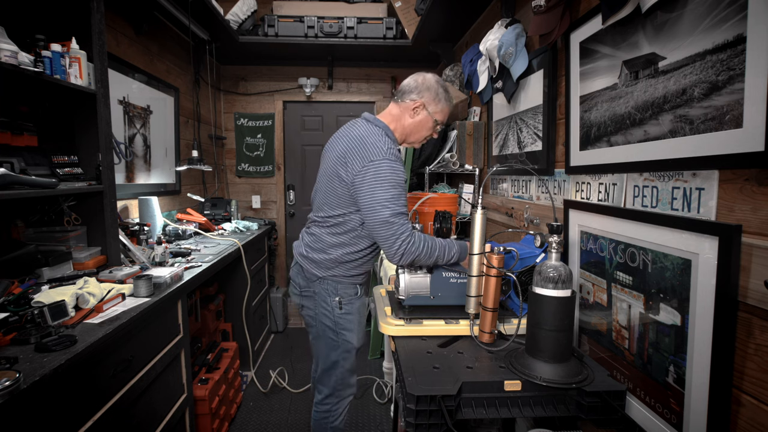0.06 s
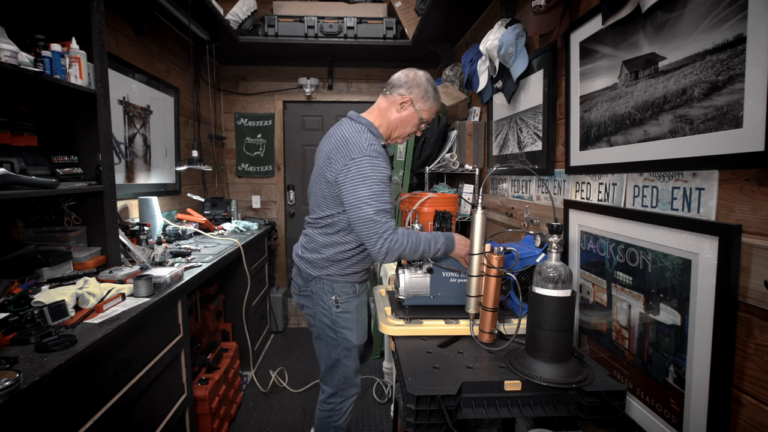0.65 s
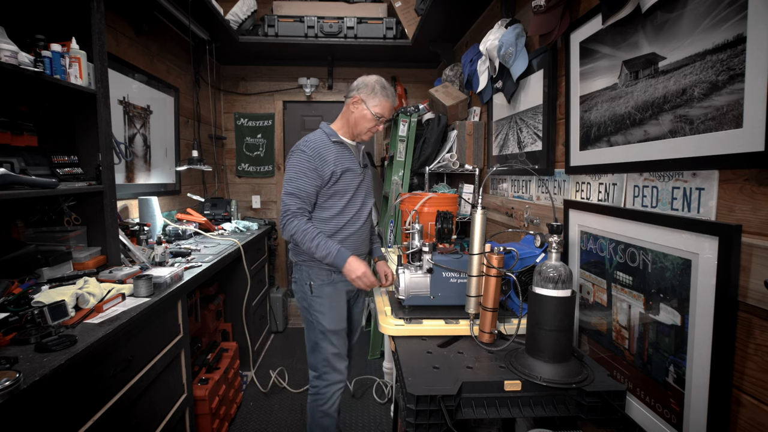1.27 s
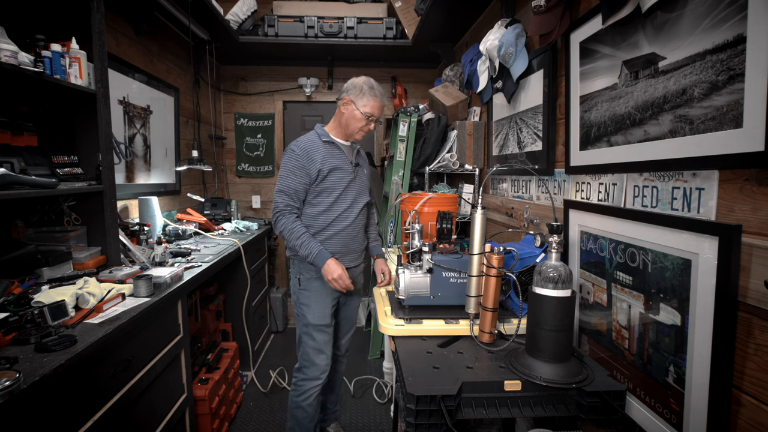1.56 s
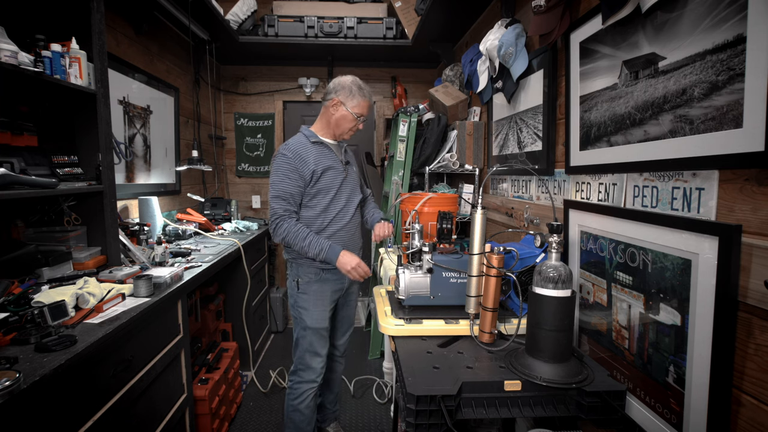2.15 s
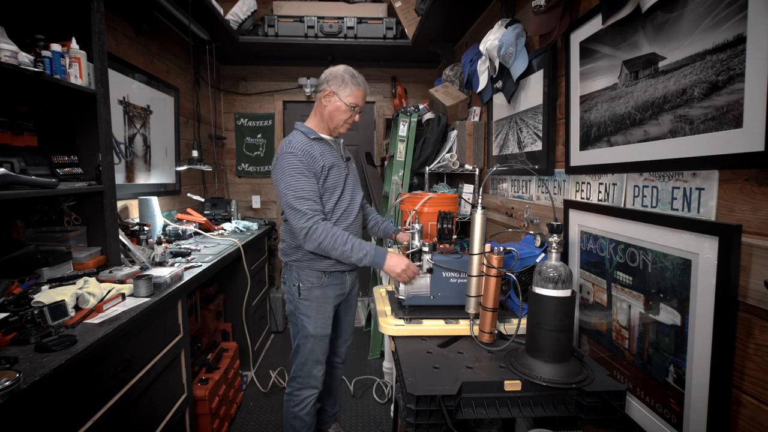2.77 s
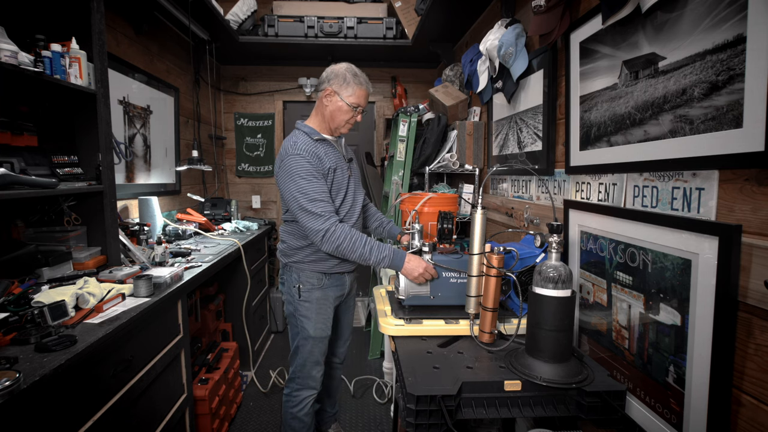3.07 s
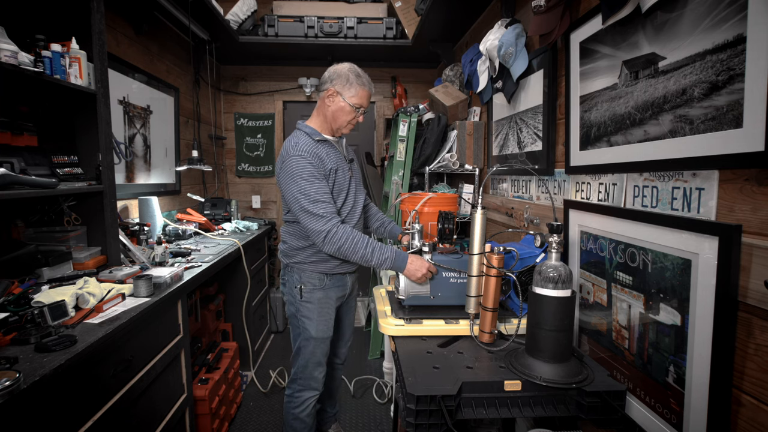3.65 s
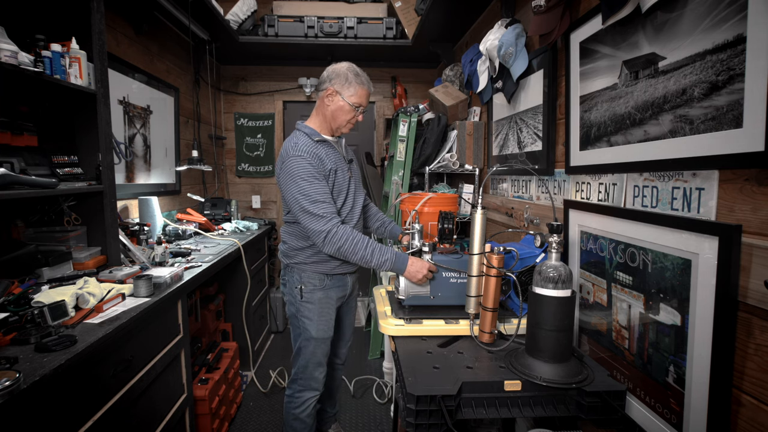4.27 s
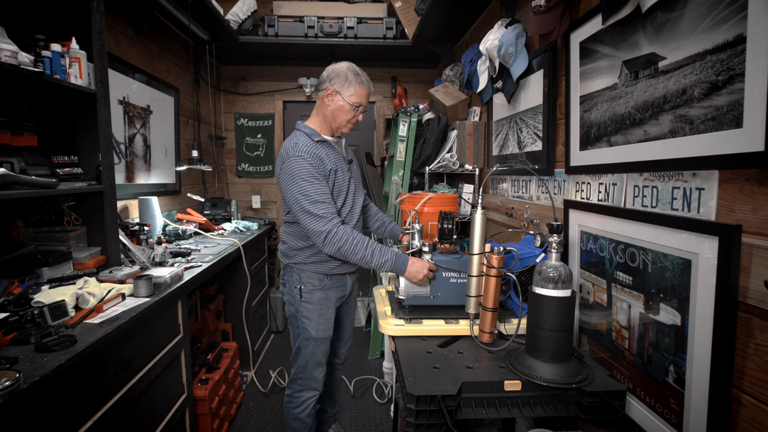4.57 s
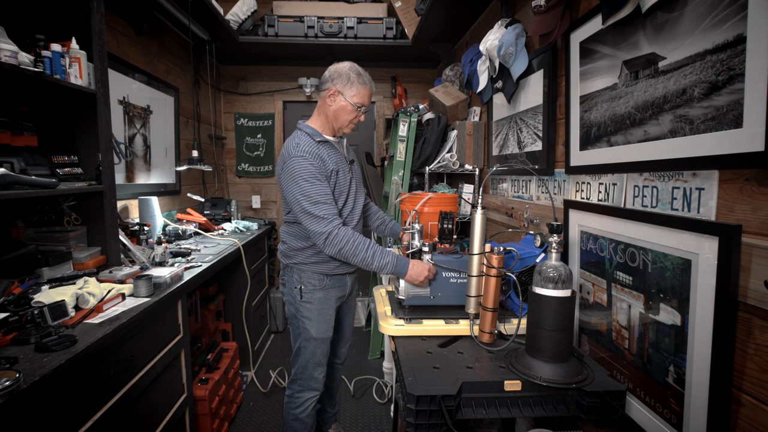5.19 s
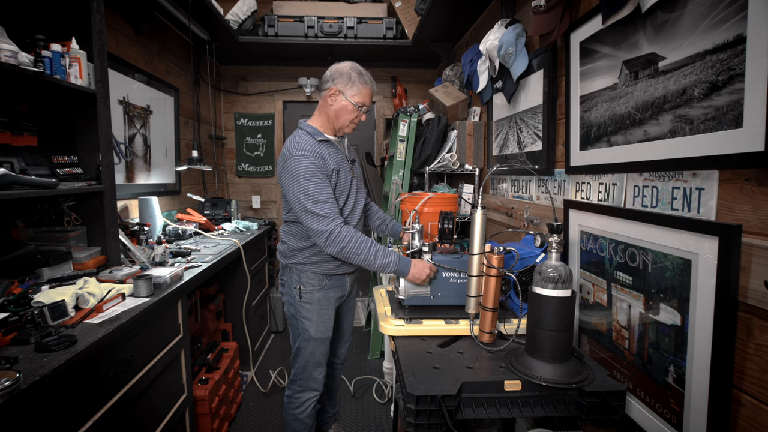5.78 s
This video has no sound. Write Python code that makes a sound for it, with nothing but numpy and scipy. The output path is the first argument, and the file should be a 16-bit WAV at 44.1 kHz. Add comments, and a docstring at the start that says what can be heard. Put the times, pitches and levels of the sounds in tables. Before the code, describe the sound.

Close to the microphone in a small workshop, a piston compressor switches on with a clunk, following a faint whine, soft bumps and a puff of air. The motor heaves a few times and races up loudly, then eases into a rapid metallic clatter and drone. A closing valve sputters and whistles faintly, and the hum pulses as the machine gradually fades.

```python
"""Small compressor in a cramped workshop.

One microphone, close to a high-pressure piston compressor on a table. A faint whine, handling bumps and
a short hiss come first; the switch clunks, the motor heaves through a few chugs and runs up. Each turn
knocks the cylinder head, shakes the case and draws air; the loud start settles. The bleed valve is
screwed shut and air hisses, spits and whistles in its gap; the knocks grow uneven, the hum beats slowly,
and the sound fades away."""
import sys
import numpy as np
from scipy import signal
from scipy.fft import rfft, irfft, next_fast_len
from scipy.io import wavfile
from scipy.ndimage import uniform_filter1d

SR = 44100
rng = np.random.default_rng(int(sys.argv[2]) if len(sys.argv) > 2 else 0)


def put_to_file(sound):
    """Save the sound as 16-bit audio at rate SR, in the file named by the first command-line argument."""
    columns = np.atleast_2d(sound).T  # one column per channel
    safe = np.clip(columns, -1, 1)
    whole_steps = np.round(safe * 32767)
    wavfile.write(sys.argv[1], SR, whole_steps.astype(np.int16))


N = 257086
TIME = np.arange(N) / SR

START_S, KNOCKING_S, ENGAGED_S = .76, .9, .948  # the crank moves, the piston knocks, then bears its load
START_HZ, RUN_HZ, SPIN_UP_S = 16.2, 56.627, .18  # crank turns per second; time to speed up by a factor e
TOP_OF_STROKE_S = 1.2009  # one moment when the piston is at the top
CLOSING_S, CLOSED_S, LOADED_S = 1.58, 2.54, 3.2  # the bleed valve starts to close, is shut; full pressure
BEAT_HZ, BEAT_CREST_S = 6.82, 4.2  # slow beating of the hum

# Noise colours. Each row: frequency in Hz, relative spectral level in dB.
ROOM_COLOUR = [(24, -65), (40, -27), (102, -17.5), (271, -9), (354, -1.5), (623, -13), (815, -9),
               (899, -16.5), (1970, -25), (2580, -40), (4010, -31), (5130, -34), (10700, -64.5),
               (14000, -84)]  # the workshop itself
PUFF_COLOUR = [(590, -46), (1000, -15), (1230, -3), (1500, -8), (2020, 4.5), (3210, -19.5), (3600, -10),
               (6270, -17), (7180, -16), (9640, -17), (15000, -43)]  # the short hiss before the switch
GASP_COLOUR = [(2000, -2), (2900, 3), (3600, -8), (4300, -17), (4800, -0.5), (6000, 2), (7000, -10),
               (7900, -3.5), (9500, -17.5), (12600, -17.5), (15500, -32)]  # the intake at low speed
GRIND_COLOUR = [(150, -1.5), (300, -0.5), (1000, -2), (2000, -6.5), (3000, -18)]  # the slow crank
INTAKE_COLOUR = [(2000, 10.5), (3150, 2), (3500, -8), (4600, -8.5), (5300, -6), (6100, 4), (7000, -6.5),
                 (7800, -3.5), (10000, -13.5), (11200, -15), (12600, -13.5), (15500, -33)]  # air through the valves at speed
RUMBLE_COLOUR = [(70, -32), (100, -21), (180, -23), (270, -12.5), (430, 1), (560, -7), (780, -17),
                 (1100, -6)]  # the shaking case
DRUMMING_COLOUR = [(80, -19), (120, -14), (170, -7), (270, 9), (350, -7), (480, -5), (700, -12), (1000, -7)]  # the table under the straining motor
CLATTER_COLOUR = [(500, -37), (780, -21), (1000, -3), (1400, 14.5), (1800, 20.5), (2300, 3), (2550, -15),
                  (2750, -9), (3100, 0), (3700, -35.5), (6000, -65)]  # loose parts

# Resonances. Each row: frequency in Hz, width in Hz, relative level in dB.
HEAD_MODES = [(1186.8, 5.35, -22.5), (1398.3, 17.2, -15), (1581, 4.2, -32), (1716, 71, -14),
              (1918, 34, -19), (3030, 340, -6.5)]  # the cylinder head
CLACK_MODE = [(1790, 270, 0)]  # its main mode, a short clack
COVER_MODES = [(620, 920, -21), (903.4, 11, -14.5), (1008.5, 18.3, -8), (1160, 16, -12), (1280, 1040, -7.5),
               (2137, 39, -17), (2010, 207, 11.5), (2290, 130, 3.5), (2800, 500, -16)]  # the sheet-metal cover
THUMP_MODES = [(508, 180, 8.5), (630, 170, -3)]  # the case under each knock
JET_MODES = [(5536, 420, -3), (6300, 930, -6), (7100, 910, -3.5), (7420, 1600, -3), (8520, 600, -6),
             (9200, 480, -9.5), (9960, 470, -9.5), (10800, 1200, -15), (12400, 1200, -18),
             (13200, 800, -19), (14300, 1600, -23)]  # the jet at the bleed valve
CONTACT_MODES = [(1710, 440, 1.5), (2200, 450, -34.5), (670, 490, -21)]  # the click of hard contact

# Soft bumps of handling. Each row: start in seconds, level in dB.
HANDLING_BUMPS = [(0.015, -27), (0.205, -43), (0.243, -34), (0.288, -28.5), (0.384, -30), (0.626, -34)]
# The motor's first heaves. Each row: start in seconds, level in dB, pitch in Hz,
# time to die by 60 dB in seconds, relative click level in dB.
MOTOR_CHUGS = [(0.7622, -9.5, 306, 0.012, -5), (0.78, -10, 259, 0.018, -22), (0.81, -11, 234, 0.022, -8),
               (.821, -19, 214, 0.022, 10), (0.8536, -6.5, 263, 0.017, -7), (0.8669, -13, 308, 0.046, 7.5),
               (0.8857, -9, 266, 0.023, -6), (0.914, -12.5, 250, 0.022, 0), (0.925, -17, 300, 0.023, 4)]
# Gasps of the intake while the crank is slow. Each row: peak time in seconds, level in dB.
INTAKE_GASPS = [(.765, -42), (0.778, -33), (0.82, -29.5), (0.855, -24), (0.887, -22.5), (0.917, -26.5),
                (0.942, -25.5), (.964, -27), (.983, -24)]
# Hoarse air in the valve gap. Each row: peak time in seconds, level in dB, centre in Hz, width in Hz,
# spread in seconds.
VALVE_RASPS = [(2.563, -45, 2400, 385, 0.24), (2.716, -46.5, 1360, 302, 0.18),
               (2.995, -62, 3060, 256, 0.26), (5.0, -77, 2820, 446, 1)]
# Whistles in the gap. Each row: peak time in seconds, level in dB, pitch in Hz, spread in seconds.
VALVE_WHISTLES = [(3.143, -51.5, 7740, 0.053), (3.23, -54.5, 6720, 0.16), (3.223, -57.5, 9150, 0.038),
                  (3.55, -58, 7040, 0.17), (3.85, -63, 6760, 0.18), (3.897, -64, 7070, 0.25),
                  (3.927, -69, 9900, 0.11), (4.08, -76, 13300, 0.19), (4.31, -68, 9300, 0.073),
                  (4.912, -68.5, 8650, 0.09), (5.2, -67, 8300, .03)]
# The clearest spits in the gap. Each row: peak time in seconds, level in dB, pitch in Hz.
CLEAR_SPITS = [(3.6, -60, 5270), (3.865, -57, 5500), (3.971, -59, 5940), (3.979, -51, 6900),
               (4.094, -52, 5570), (4.342, -60, 5500), (4.482, -58, 5480), (4.855, -64, 5580),
               (4.943, -55.5, 5540), (5.209, -62, 5850), (5.313, -61, 5580)]
# Hum of the case. Each row: multiple of the crank speed, relative level in dB running, then straining.
HUM_HARMONICS = [(2, -26.5, -12), (3, -25.5, -11.5), (4, -21, -13), (5, -11, -5.5), (6, -15.5, -12),
                 (7, 1, -7.5), (8, -8.5, -12.5), (9, -13.5, -12), (10, -17.5, -7.5), (11, -16.5, -28),
                 (12, -25, -9), (13, -19.5, -7.5), (15, -25, -12), (16, -20.5, -12.5), (18, -31, -23)]
# The table and near walls throw each knock back to the microphone. Each row: delay in seconds, gain in dB.
NEAR_ECHOES = [(.0028, -20.5), (.0075, -27), (.01, -20.5)]
# Swells and dips as the sound fades. Each row: time in seconds, shaking gain in dB, knock gain in dB.
FADE_GAINS = [(2.2, 0.5, 2.5), (2.7, -4, 0), (2.91, -5, -2), (2.98, -3.5, -0.5), (3.15, -9.5, -2.5),
              (3.23, -9, -3.5), (3.29, -7.5, -3), (3.41, -14, -10), (3.48, -13, -8), (3.7, -18.5, -13),
              (3.84, -19, -16.5), (3.95, -20, -16), (4.04, -19.5, -13.5), (4.15, -20, -18),
              (4.23, -19.5, -16.5), (4.31, -21.5, -17.5), (4.4, -18.5, -13), (4.48, -21.5, -17.5),
              (4.57, -21, -19.5), (4.64, -22.5, -22), (4.7, -22, -18.5), (4.77, -27.5, -25),
              (4.95, -23.5, -24.5), (5.1, -26.5, -25.5), (5.4, -25, -26.5), (5.7, -26.5, -27.5),
              (5.83, -33.5, -33)]


def undb(db):
    """Decibels to gain."""
    return 10 ** (np.asarray(db) / 20)


def unit(x):
    """Scale to rms 1."""
    return x / np.sqrt(np.mean(x ** 2))


def ramp(start_s, end_s):
    """Rises from 0 to 1 between two times."""
    return np.clip((TIME - start_s) / (end_s - start_s), 0, 1)


def since(s):
    """Seconds elapsed after a moment, zero before it."""
    return np.maximum(TIME - s, 0)


def swell(s, spread_s):
    """A bell-shaped rise and fall around one moment."""
    return np.exp(-.5 * ((TIME - s) / spread_s) ** 2)


def throb(turns, depth_db, crest):
    """A gain that swings up and down once a turn; the crest's place is a share of the turn."""
    return undb(depth_db * np.cos(2 * np.pi * (turns - crest)))


def walk(rate_hz):
    """A random wander with a spread near 1."""
    knots = 1.1 * rng.standard_normal(size=12000)
    return np.interp(TIME * rate_hz, np.arange(len(knots)), knots)


def noise(colour):
    """Noise of rms 1 with the given spectrum, falling by 20 dB an octave outside it."""
    hz, db = np.transpose(colour)
    size = next_fast_len(N, real=True)
    octave = np.log2(np.maximum(np.arange(size // 2 + 1) * SR / size, 1))
    outside = np.abs(octave - np.clip(octave, np.log2(hz[0]), np.log2(hz[-1])))
    gain = undb(np.interp(octave, np.log2(hz), db) - 20 * outside)
    return unit(irfft(rfft(rng.standard_normal(size)) * gain)[:N])


def highpass(x, hz, order=2):
    """Shed the bass, which small parts barely radiate."""
    return signal.sosfilt(signal.butter(order, hz, "high", fs=SR, output="sos"), x)


def lowpass(x, hz):
    """Cut the treble steeply."""
    return signal.sosfilt(signal.butter(6, hz, fs=SR, output="sos"), x)


def band(x, hz, width_hz):
    """Keep a band around a centre frequency."""
    edges = [hz - width_hz / 2, hz + width_hz / 2]
    return signal.sosfilt(signal.butter(2, edges, "band", fs=SR, output="sos"), x)


def convolve(x, response):
    """Play x through an impulse response."""
    return signal.oaconvolve(x, response)[:N]


def ring(modes):
    """Impulse response of damped modes."""
    t = TIME[:SR // 10]
    return sum(undb(db) * np.exp(-np.pi * width * t) * np.sin(2 * np.pi * hz * t)
               for hz, width, db in modes)


def workshop(x, t60_s, wet_db):
    """The direct sound reaches the microphone first, then a short, dense tail off cluttered walls."""
    t = TIME[:SR // 2]
    tail = rng.standard_normal(len(t)) * np.exp(-np.log(1000) * t / t60_s) * (t > .004)
    return x + undb(wet_db) * convolve(x, tail / np.sqrt(np.sum(tail ** 2)))


def room_tone(fall_db_per_s=22, floor_db=-90.5):
    """Behind everything, the room's noise dies to a floor under a faint steady hiss."""
    hiss = unit(band(rng.standard_normal(N), 4250, 3000)) * undb(-78.5)
    room_db = np.maximum(-39.5 - fall_db_per_s * since(.038), floor_db)
    return noise(ROOM_COLOUR) * undb(room_db) + hiss


def whine(hz=814, stop_s=.32):
    """A thin whine sags in level, then rings out quickly."""
    tone = np.sqrt(2) * np.sin(2 * np.pi * np.cumsum(hz + 1.9 * walk(25)) / SR)
    return tone * undb(-42.5 - 24 * TIME - 105 * since(stop_s))


def puff(peak_s=.3454, rise_db_per_s=804, fall_db_per_s=314):
    """One short hiss ahead of the switch."""
    below_peak_db = np.maximum(rise_db_per_s * (peak_s - TIME), fall_db_per_s * (TIME - peak_s))
    return noise(PUFF_COLOUR) * undb(-34 - below_peak_db)


def thud(s, db, hz, t60_s, click_db):
    """A soft blow sets the unit bouncing on its table, with a click of hard contact."""
    width = np.log(1000) / np.pi / t60_s
    body = ring([(hz, width, 0), (hz * 1.18, width * 1.4, -8), (hz * 1.48, width * 1.16, -9)])
    click = highpass(ring(CONTACT_MODES), 720)
    blow = lowpass(highpass(body, .6 * hz) + undb(click_db) * click, 1920)
    return undb(db - .5) * np.pad(blow, (int(s * SR), N))[:N]


def blows():
    """At the table: handling bumps, the clunk of the switch and the motor's first heaves."""
    bumps = sum(thud(s, db, hz=121, t60_s=.035, click_db=-21) for s, db in HANDLING_BUMPS)
    switch = thud(s=.6868, db=-11.5, hz=325, t60_s=.051, click_db=-1.5)
    chugs = sum(thud(*chug) for chug in MOTOR_CHUGS)
    return bumps + switch + chugs


def grinding():
    """The crank grinds briefly while it is still slow."""
    grit = noise(GRIND_COLOUR) * undb(-30 + 3.4 * walk(250))
    return grit * swell(.889, .054) * ramp(START_S, START_S + .01)


def gasps(rise_s=.003, decay_s=.0062):
    """A small leak after the switch, then the intake draws air in separate gasps."""
    leak = undb(-49) * swell(.7275, .011)
    breaths = sum(undb(db) * ramp(s - rise_s, s) * np.exp(-since(s) / decay_s) for s, db in INTAKE_GASPS)
    return noise(GASP_COLOUR) * (leak + breaths)


def edge_tone(hz, width_hz, wander=.009, flutter_db=3.5):
    """Air over a sharp edge: a narrow, fluttering band of rms 1 whose pitch wanders a little."""
    phase = 2 * np.pi * np.cumsum(hz * (1 + wander * walk(30))) / SR
    tone = walk(width_hz) * np.cos(phase) + walk(width_hz) * np.sin(phase)
    return unit(tone * undb(flutter_db * walk(110)))


def whistles():
    """In the nearly shut gap wavering whistles come and go."""
    return sum(edge_tone(hz, width_hz=620) * undb(db) * swell(s, spread_s)
               for s, db, hz, spread_s in VALVE_WHISTLES)


def rasp(turns):
    """Each stroke forces a hoarse burst of air through the narrowed gap."""
    bursts = throb(turns, depth_db=7, crest=.04)
    return sum(unit(band(rng.standard_normal(N), hz, width) * bursts) * undb(db) * swell(s, spread_s)
               for s, db, hz, width, spread_s in VALVE_RASPS)


def spit(s, db, hz, spread_s, width_hz=260):
    """One tiny squeak of air, roughened by a drifting phase."""
    t = np.arange(-SR // 40, SR // 40) / SR
    drift = np.cumsum(rng.standard_normal(len(t))) * np.sqrt(2 * np.pi * width_hz / SR)
    phase = uniform_filter1d(2 * np.pi * hz * t + drift, size=40)
    squeak = undb(db) * np.exp(-.5 * (t / spread_s) ** 2) * np.sin(phase)
    return np.pad(squeak, (int(s * SR) - SR // 40, N))[:N]


def spits(fade_db, count=170, from_s=2, spread_s=.0035):
    """Moisture spits through the gap at random on the jet's seven lowest resonances; a few stand out."""
    out = sum(spit(s, db, hz, spread_s) for s, db, hz in CLEAR_SPITS)
    for when, which, weakness, detune, length in rng.random((count, 5)):
        s = from_s + when * (TIME[-1] - from_s)
        hz, width, mode_db = JET_MODES[int(which * 7)]
        db = mode_db - 40.5 - 12 * weakness + .8 * np.interp(s, TIME, fade_db)
        out += spit(s, db, hz + width * (detune - .5), spread_s * (.3 + .7 * length))
    return out


def bleed_jet(turns, closing, fade_db, tilt_db_per_octave=7):
    """A sputtering jet: as the gap narrows its high resonances emerge and each stroke's rush dies."""
    jet = 0
    for hz, width, db in JET_MODES:
        tone = edge_tone(hz, width)
        flicker_db = 3 * walk(14) + 2.5 * walk(70)  # slow swells and fast sputter
        tilt_db = tilt_db_per_octave * closing * np.log2(hz / JET_MODES[0][0])
        jet += tone * undb(db + flicker_db + tilt_db)
    jet = workshop(highpass(jet, 4900, order=8), t60_s=.016, wet_db=-10)
    sputter = unit(jet) * undb(-53 + 2 * closing)
    gusts = band(rng.standard_normal(N), 4640, 880) * throb(turns, depth_db=9, crest=.8)
    rush = unit(gusts) * undb(-54.5) * (1 - closing)
    return (sputter + rush) * (TIME > START_S) * undb(.98 * fade_db)


def intake(turns):
    """Air spits through the valves just before each knock, never twice alike."""
    hiss = noise(INTAKE_COLOUR) * throb(turns, depth_db=3.75, crest=.8) * undb(3.2 * walk(350))
    return unit(workshop(hiss, t60_s=.031, wet_db=-6.5))


def crank_speed():
    """The motor gains speed exponentially, then locks softly to its running speed, given as 1."""
    free_hz = START_HZ * np.exp((TIME - START_S) / SPIN_UP_S)
    return 1 / (1 + (RUN_HZ / free_hz) ** 10) ** (1 / 10)


def case_hum(turns, speed, pressure):
    """The case hums on the crank's multiples and rumbles; while the motor strains, the table drums."""
    strain = 1 - ramp(.97, 1.47)
    boom_db = 6 * (1 - ramp(1.5, 2.6))  # extra low hum until the pressure builds
    tones = 0
    for multiple, running_db, straining_db in HUM_HARMONICS:
        boomed_db = running_db + boom_db * np.exp(-.5 * (multiple - 4.03) ** 2)
        rough_db = (1.3 + 2 * strain) * walk(45)
        level_db = boomed_db * (1 - strain) + straining_db * strain + rough_db
        tones += undb(level_db) * np.sin(2 * np.pi * (multiple * turns + rng.random()))
    beat = throb(BEAT_HZ * (TIME - BEAT_CREST_S), depth_db=.8 + 1.8 * pressure, crest=0)
    hum = undb(4) * tones * beat * speed ** 3
    rumble = noise(RUMBLE_COLOUR) * undb(-9.5)
    drumming = noise(DRUMMING_COLOUR) * undb(-6) * strain ** 2
    return hum + (rumble + drumming) * throb(turns, depth_db=7.5 + 13 * (1 - speed), crest=.85)


def strokes(turns, scatter_db, jitter_s):
    """One pulse at the top of each stroke, as uneven in size and timing as the two curves say."""
    tops = np.interp(np.arange(np.ceil(turns[0]), turns[-1]), turns, np.arange(N))
    top_samples = tops.astype(int)
    timing_draw, size_draw = rng.standard_normal((len(tops), 2)).T
    at = np.clip(tops + jitter_s[top_samples] * SR * timing_draw, 0, N - 2)
    size = undb(scatter_db[top_samples] * size_draw)
    whole, fraction = at.astype(int), at % 1  # each pulse is shared between two samples
    return np.bincount(whole, size * (1 - fraction), N) + np.bincount(whole + 1, size * fraction, N)


def piston(turns, speed, pressure, hardness_db):
    """Knocks ring the head and thump the case; hard ones ring the cover. At speed loose parts clatter."""
    pulses = strokes(turns, scatter_db=.6 + .8 * pressure, jitter_s=14e-6 + 55e-6 * pressure)
    after_knock = turns % 1
    valve_buzz = rng.standard_normal(N) * undb(-20.5) * speed * (.35 + 1.5 * np.exp(-after_knock / .1))
    head = convolve(-unit(pulses) - valve_buzz, ring(CLACK_MODE + HEAD_MODES))
    head = unit(band(head, 1870, 810))
    cover = convolve(lowpass(pulses, 2400), ring(COVER_MODES))
    cover = unit(highpass(highpass(cover, 490), 490)) * undb(hardness_db - 4.5)
    tick = unit(convolve(pulses, ring([(5500, 1500, 0)]))) * undb(.37 * hardness_db - 18.5)
    thump = convolve(pulses, ring(THUMP_MODES))
    thump = unit(highpass(highpass(thump, 510), 510)) * undb(hardness_db - 9)
    clatter = noise(CLATTER_COLOUR) * (1 + .16 * np.exp(-after_knock / .16))
    clatter = unit(clatter) * speed ** 3 * undb(.016 * hardness_db - 11.3)
    knocks = head + cover + tick + thump
    echoes = sum(undb(db) * np.interp(TIME - s, TIME, knocks) for s, db in NEAR_ECHOES)
    return workshop(knocks + echoes, t60_s=.1, wet_db=-19) * undb(-3) + clatter


def scene():
    """Close to the table: the crank times the machine; speed, surge, valve and fade set the levels."""
    speed = crank_speed()
    turns = np.cumsum(speed) * RUN_HZ / SR
    turns -= np.interp(TOP_OF_STROKE_S, TIME, turns)
    closing, pressure = ramp(CLOSING_S, CLOSED_S), ramp(CLOSED_S, LOADED_S)

    fade_s, *fade_columns = np.transpose(FADE_GAINS)
    shake_fade_db, knock_fade_db = (np.interp(TIME, fade_s, db) for db in fade_columns)
    shake_surge_db = 17 * (1 - ramp(.95, 1.325))  # the loud start settles
    knock_surge_db = 13 * (1 - ramp(1.1, 1.363))
    shake_db = -36.5 + 13.5 * np.log2(speed) + shake_surge_db + shake_fade_db
    knock_db = -34 + 8.5 * np.log2(speed) + knock_surge_db + knock_fade_db
    air_db = (shake_db + knock_db) / 2 - 9 - 5 * closing
    hardness_db = -3 + 1.5 * (1 - speed) - 15 * closing ** 2  # trapped air cushions the piston

    shaking = case_hum(turns, speed, pressure) * undb(shake_db)
    engaging = ramp(KNOCKING_S, ENGAGED_S) ** .5
    knocking = piston(turns, speed, pressure, hardness_db) * undb(knock_db) * engaging
    machine = (shaking + knocking + intake(turns) * undb(air_db)) * ramp(START_S, ENGAGED_S) ** 2
    valve = bleed_jet(turns, closing, knock_fade_db) + spits(knock_fade_db) + whistles() + rasp(turns)
    start = workshop(blows() + grinding() + gasps(), t60_s=.18, wet_db=-9)
    background = whine() + room_tone() + puff()
    return (background + start + valve + machine)[None]


def record(dry):
    """The loudest peaks are rounded softly; the microphone sheds the deep bass and the very top."""
    top_cut = signal.ellip(8, .2, 70, 15700, fs=SR, output="sos")
    return signal.sosfilt(top_cut, highpass(np.tanh(dry), 119))


dry = scene()
out = record(dry)
put_to_file(out)
```